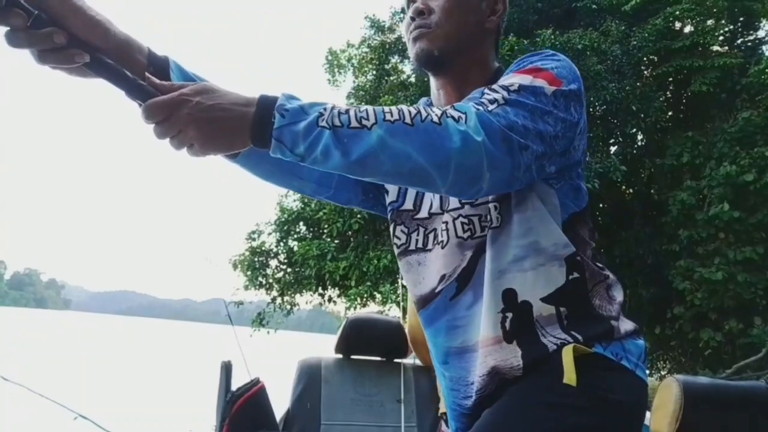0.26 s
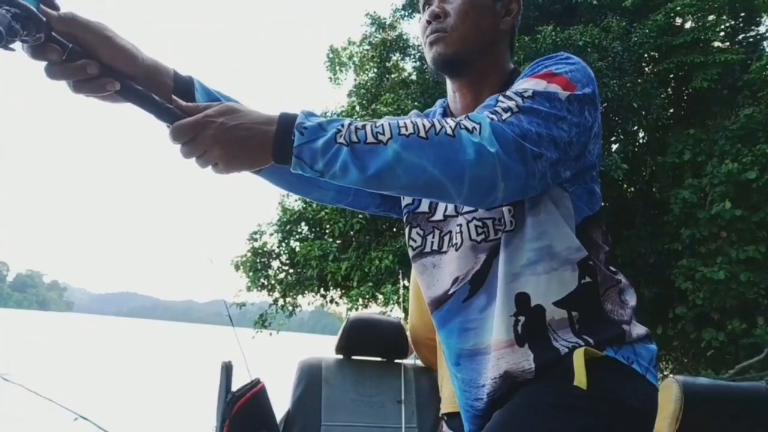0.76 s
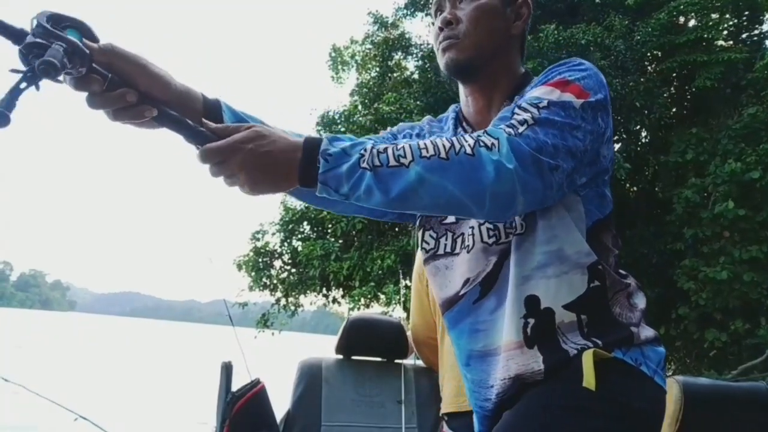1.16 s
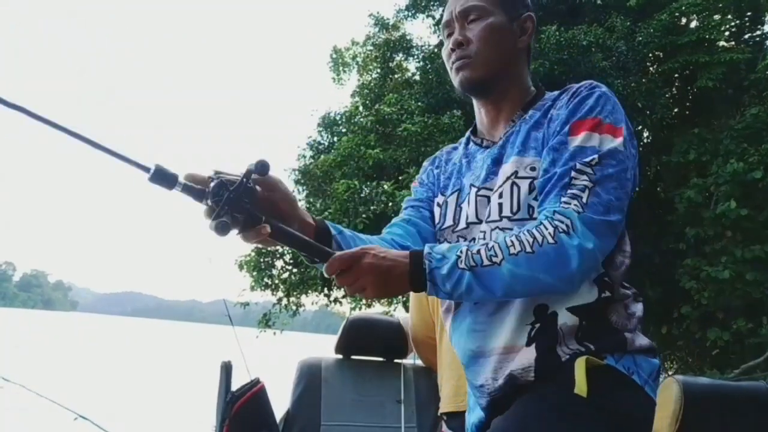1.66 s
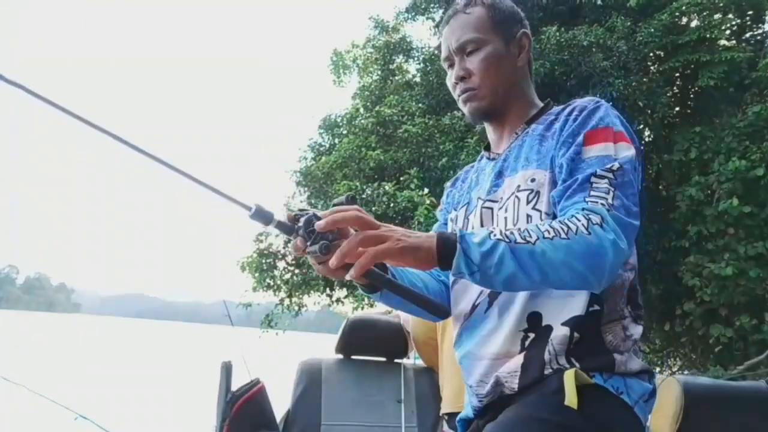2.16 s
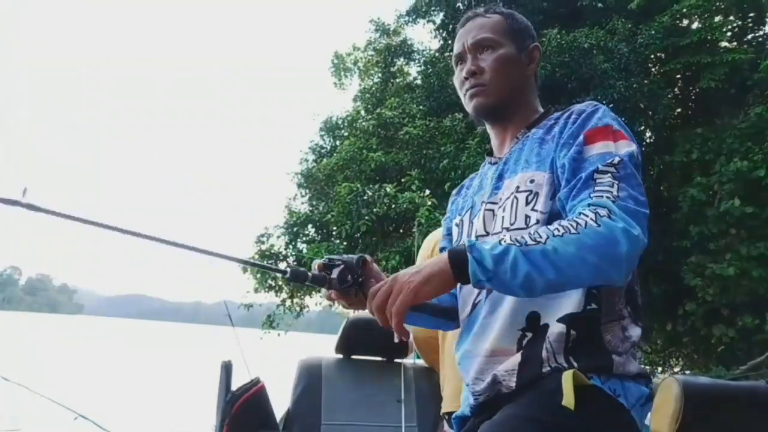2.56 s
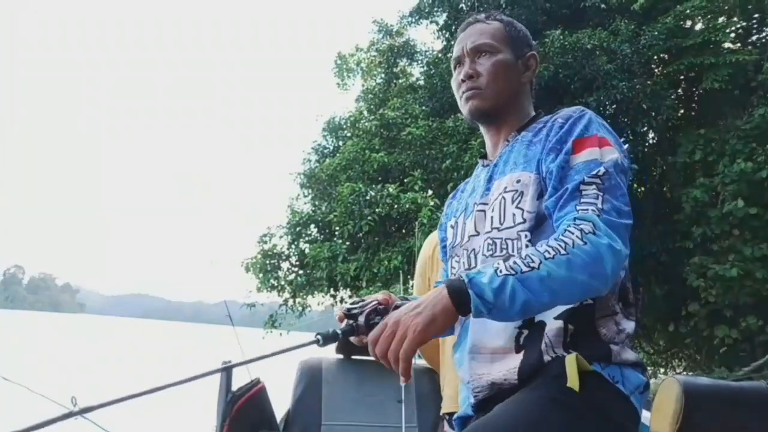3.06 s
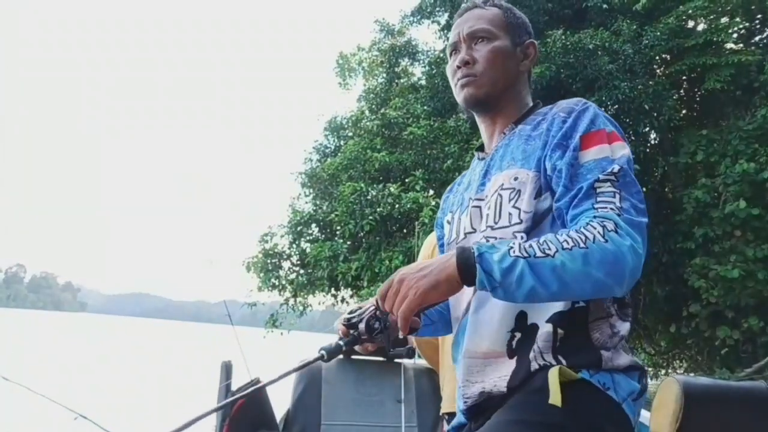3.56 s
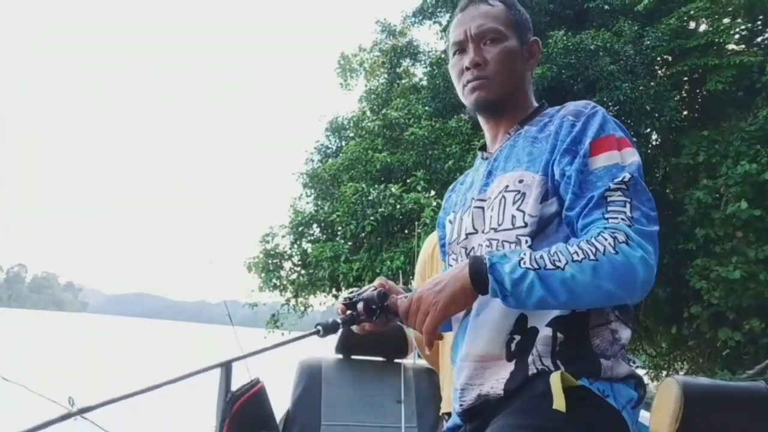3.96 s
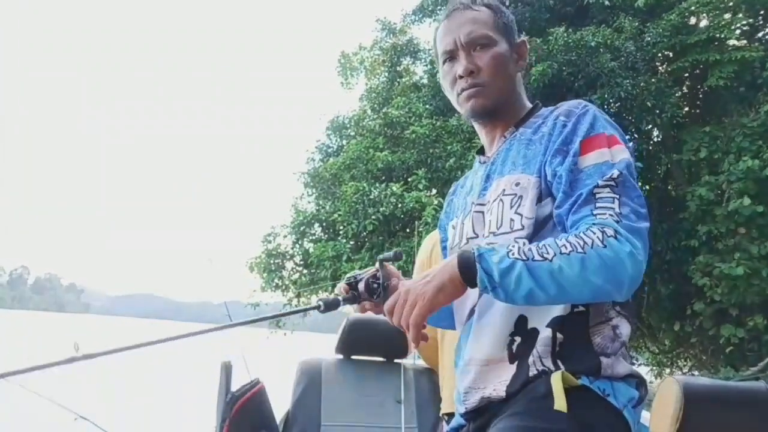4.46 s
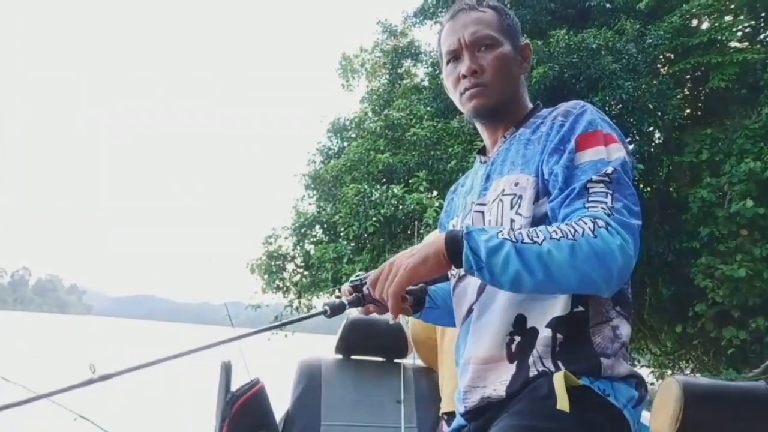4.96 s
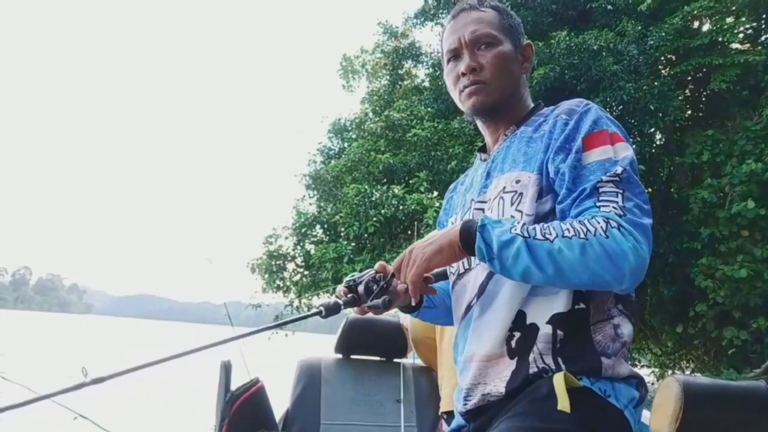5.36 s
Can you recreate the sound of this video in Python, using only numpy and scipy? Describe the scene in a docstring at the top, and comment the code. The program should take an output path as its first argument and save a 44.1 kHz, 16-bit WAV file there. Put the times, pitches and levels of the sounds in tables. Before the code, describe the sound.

A small boat on a quiet river beside forest, heard close in stereo with little deep bass and no extreme treble. From 0 s, fluttering, ticking line hiss runs off the spool, fading steadily and mostly gone by about 2 s. Under it are soft low hull booms, a knock with a bright rattle at 0.3 s, and a cluster of knocks and dry tackle clicks from 1.1 to 1.5 s, sharpest at 1.3 s. A light knock follows at 2 s. At 2.5 s the reel clutch snaps shut in a very quick volley of bright metallic cracks, the loudest event, with a short hissy tail. Gritty line swish swells from 3.05 to 3.3 s. Dull hull thumps land at 3.9, 4.75 and 5.05 s, the last more clattery. Faint rising drips occur between. Rapidly pulsed high cicada buzzing, nearest on the right, thin cricket chirps and low river murmur persist throughout.

```python
"""A small boat on a forest river just after a cast: the hiss of line off the spool dies away as noise with a
fading level, while water and feet knock the hull (swelling low notes, damped bursts) and reel and rod rattle.
At 2.5 s the reel's clutch snaps shut as a volley of metal rings; at 3 s the line swishes, gritty noise, as the
rod tip drops. Now and then a drop falls, a rising note. All the while cicadas buzz from the bank as pulsed
notes and noise, crickets chirp in narrow noise, and river and forest murmur in flickering bands."""
import sys
import numpy as np
from scipy import signal
from scipy.fft import rfft, irfft, next_fast_len
from scipy.io import wavfile
from scipy.ndimage import uniform_filter1d

SR = 44100
rng = np.random.default_rng(int(sys.argv[2]) if len(sys.argv) > 2 else 0)


def inscribe(sig):
    """Save sig as 16-bit PCM at rate SR to the path in sys.argv[1].

    A 1-D sig is mono; a 2-D sig holds one channel per row.
    Samples are clipped to [-1, 1] before scaling.
    """
    pcm = np.round(np.clip(np.atleast_2d(sig).T, -1, 1) * 32767)
    wavfile.write(sys.argv[1], SR, pcm.astype(np.int16))


N = 248264
T = np.arange(N) / SR

# Tone of river and forest. Each row: frequency in Hz, relative level in dB.
AIR_COLOUR = [(40, -12), (90, -4), (160, -1.5), (300, -11.5), (600, -20), (1200, -20), (2200, -15.5),
              (4500, -22.5), (5230, -36), (5310, -5.5), (5440, -15.5), (5510, -29), (5700, -12.5),
              (6100, -2), (6700, -19), (9500, -11.5), (10200, -12), (11500, -22.5), (12500, -5),
              (14500, -17.5), (15300, -11.5)]
# Far cicadas. Each row: pulses a second, level in dB before the chorus swell, pulse width in cycles,
# pitch in Hz, bandwidth in Hz, left minus right in dB.
FAR_CICADAS = [(121, -53.5, 1.05, 7630, 396, 0.5), (88.8, -57, 0.52, 8140, 525, -9)]
# Swell of all cicadas together. Each row: time in seconds, gain in dB.
CHORUS_SWELL = [(0, 8), (0.401, 4.5), (1.2, 5), (2.002, 3.5), (3.002, 4), (4, 3), (4.998, 2.5), (5.63, 2.5)]
# The near cicada's three buzzes in each cycle, a faint one and two louder, then a rest.
# Each row: place in the cycle from 0 to 1, relative level in dB, pitch in Hz, fall of pitch in Hz per cycle.
BUZZES = [(.27, -9, 7800, 2480), (.5, -3, 7890, 6070), (.73, -4, 7908, 6506)]
# Drift of the near cicada's rhythm. Each row: time in seconds, lead in cycles.
CYCLES_AHEAD = [(0, .52), (.6, .57), (1.8, .55), (2.4, .63), (3, .6), (4, .37), (4.9, .39), (5.63, .24)]
# Nearer cricket chirps. Each row: start in seconds, level in dB before the fade, pitch in Hz.
NEAR_CHIRPS = [(0.0494, -50.5, 9190), (0.5666, -53.5, 9240), (0.688, -52, 9200), (.975, -57, 9340),
               (1.4287, -56, 9050), (1.6806, -52, 9200), (1.9674, -57, 9050), (2.075, -57, 9400),
               (2.6339, -58, 9080), (2.6888, -53, 9190), (3.7853, -52, 9170), (4.39, -58, 9010),
               (4.4453, -56, 9390), (4.69, -58, 9210), (4.8304, -57, 9080), (4.9741, -52.5, 9190),
               (5.2106, -57, 9320), (5.36, -58, 9180), (5.57, -57, 9120)]
# Hull booms. Each row: time in seconds, level in dB, pitch in Hz, hold in seconds.
BOOMS = [(0.009, -52, 122, 0.045), (0.227, -41.5, 142, 0.011), (0.261, -49, 111.3, 0.035),
         (0.429, -51.5, 120, 0.029), (0.745, -64, 241, 0.017), (1.011, -45.5, 259, 0.013),
         (1.116, -52.5, 126, 0.013), (1.169, -49, 132.5, 0.036), (1.237, -59.5, 130, 0.019),
         (1.452, -43.5, 134.3, 0.029), (1.752, -50.5, 148, 0.03), (2.611, -55.5, 252.5, 0.03),
         (2.678, -58.5, 226.6, 0.028), (3.924, -31, 139.4, 0.0048), (3.944, -40.5, 143, 0.0093),
         (3.984, -40, 103, 0.011), (4.017, -41.5, 101, 0.0092), (4.747, -33, 142, 0.0041),
         (4.812, -46, 153, 0.012), (5.058, -32.5, 243, 0.0088), (5.138, -50, 210, 0.008),
         (5.157, -47, 178, 0.016), (5.314, -54.5, 90, 0.018), (5.341, -43, 115, 0.0086),
         (5.379, -48, 131, 0.014), (5.419, -48.5, 134, 0.008), (5.561, -62, 210, 0.012)]
# Drips from rod and line. Each row: start in seconds, level in dB, starting pitch in Hz, left minus right in dB.
DRIPS = [(1.7818, -61.5, 2180, 9), (1.81, -62, 1720, 8), (2.262, -59.5, 1830, -7), (2.369, -58.5, 1704, -7),
         (2.943, -58, 1770, 6), (3.502, -60.5, 1720, 8), (3.829, -59, 1276, 5), (4.057, -61.5, 1700, 13.5),
         (4.619, -60, 1674, 15)]
# Knocks and scuffs on the hull. Each row: start in seconds, level in dB, centre of the blow in Hz,
# spread in octaves, hold in seconds, left minus right in dB.
KNOCKS = [(.314, -29, 594, 0.33, 0.022, -1), (.325, -37.5, 950, 0.13, 0.0057, -1),
          (.357, -45, 1460, 0.53, 0.028, -6.5), (.552, -53, 720, 0.21, 0.018, 8),
          (.99, -49, 420, 0.46, 0.028, -3), (1.09, -51.5, 1400, 0.24, 0.032, -6),
          (1.15, -36.5, 533, 1.6, 0.0065, 0.5), (1.326, -39.5, 607, 0.083, 0.01, -3.5),
          (1.548, -38, 403, 0.36, 0.023, -0.5), (1.98, -44, 1090, 0.23, 0.034, -13),
          (2.0, -36.5, 846, 0.61, 0.016, 2.5), (2.608, -52.5, 485, 0.13, 0.065, 1.7),
          (3.917, -41.5, 1150, 0.3, 0.0041, -5), (3.926, -34.5, 205, 0.65, 0.024, 1),
          (3.94, -43, 414, 0.22, 0.014, -4), (4.033, -55.5, 1340, 0.73, 0.018, -1),
          (4.3, -54, 339, 0.74, 0.044, 1.5), (4.55, -64, 800, 1.5, 0.017, 8),
          (4.744, -25.5, 197, 0.9, 0.028, 1.5), (4.746, -43.5, 910, 0.36, 0.0035, 5),
          (4.753, -50, 990, 0.74, 0.018, 3), (4.785, -56, 890, 0.68, 0.0095, 0),
          (5.045, -44.5, 900, 0.53, .006, -6.5), (5.05, -32.5, 700, 0.68, 0.0044, 6),
          (5.0545, -28, 564, 1, 0.003, -1.5), (5.061, -30.5, 436, 1.1, 0.0089, 2),
          (5.072, -51, 1200, 0.88, 0.015, 0), (5.13, -43.5, 398, 0.18, 0.01, 1),
          (5.45, -60, 616, 0.7, 0.0089, -5.5), (5.555, -57, 394, 1.3, 0.019, -0.5)]
# Bands the struck hull planks radiate. Each row: frequency in Hz, width in octaves, level in dB,
# time in seconds for the noise to fall 60 dB.
HULL_MODES = [(201, 0.57, 4.5, 0.097), (273, 0.45, -14, 0.12), (435.4, 0.35, -3, 0.12),
              (515, 0.37, 0.5, 0.15), (606, 0.34, -4, 0.13), (709, 0.29, -5.5, 0.18), (958, 0.31, 1, 0.1),
              (1081, 0.27, -1, 0.1), (1394, 0.49, 1, 0.072), (1850, 0.76, 2.5, 0.24)]
# Small rattles of reel and rod. Each row: start in seconds, level in dB, centre of the blow in Hz,
# spread in octaves, hold in seconds, left minus right in dB.
RATTLES = [(.337, -33.5, 3950, 0.29, 0.0072, 0), (.745, -46.5, 4370, 0.19, 0.048, 0),
           (1.121, -41, 2000, .15, 0.0057, -11), (1.15, -43.5, 1840, 0.97, 0.004, 2),
           (1.161, -48, 1590, .7, .004, 2), (1.174, -47, 2020, .6, .006, 0),
           (1.235, -55.5, 1640, 0.77, 0.019, 1.5), (1.2473, -48, 3000, 0.6, 0.004, 4),
           (1.262, -49.5, 2800, 1.1, 0.02, 2), (1.26, -46, 10500, .3, 0.011, 1),
           (1.324, -29, 2620, 0.77, 0.00069, -0.5), (1.333, -42, 3300, 1.0, 0.003, 1),
           (1.343, -42, 3000, 1.2, .008, 2), (1.369, -44.5, 2400, 1.1, 0.003, -2),
           (1.378, -50, 2700, 1, .003, -2), (1.39, -52, 2700, 1, .004, -2),
           (1.421, -41.5, 2950, 1, 0.0066, -0.5), (1.45, -55, 2800, 1.2, .008, 2),
           (1.527, -55.5, 2880, 0.89, .015, 1), (2.002, -38.5, 2000, 0.18, 0.0015, -2),
           (2.155, -55.5, 3410, 0.14, 0.011, -1), (2.452, -49, 3360, 0.35, 0.004, -3),
           (4.42, -69, 1900, 1.1, 0.12, -4.5), (4.56, -59.5, 1970, 0.49, 0.041, -5),
           (4.752, -54, 1960, 0.59, 0.011, 2), (4.793, -62, 3500, .2, 0.0087, 1),
           (5.056, -48, 2060, 1, 0.0043, -4), (5.066, -55, 2390, .9, .03, -2),
           (5.127, -51, 2500, .2, .008, -3), (5.137, -48.5, 4130, 0.17, 0.012, -2),
           (5.182, -59, 1950, 0.44, 0.032, -6)]
# Bands that rattling reel and rod radiate. Each row: frequency in Hz, width in octaves, level in dB,
# time in seconds for the noise to fall 60 dB.
TACKLE_MODES = [(1368, 0.38, 6.5, 0.18), (2000, 0.22, -0.5, 0.11), (2610, 0.15, -9, 0.26),
                (3500, 0.31, 0, 0.21), (4050, 0.25, -1.5, 0.15), (4750, 0.23, -4, 0.095),
                (10460, 0.76, 2, .1)]
# Line swish. Each row: time in seconds, level in dB, scrape near 500 Hz in dB, scrape near 1200 Hz in dB.
SWISH_LEVELS = [(3.02, -80, -84, -80), (3.036, -66, -78, -64), (3.047, -60, -51, -52),
                (3.07, -50, -52, -52), (3.1, -43, -57, -51), (3.135, -41, -58, -57), (3.17, -40, -63, -63),
                (3.2, -38.5, -61, -57), (3.235, -37, -53, -52), (3.26, -39, -58, -49),
                (3.295, -47, -57, -57), (3.32, -58, -68, -68), (3.36, -80, -87, -87)]
# Tone of the swish. Each row: frequency in Hz, relative level in dB.
SWISH_COLOUR = [(600, -43), (1300, -8.5), (1690, -9.5), (2520, 0), (4070, -0.5), (5300, -8.5), (7000, -3.5),
                (9100, -19), (15400, -90.5)]
# Tone of the spool's lower hiss. Each row: frequency in Hz, relative level in dB.
SPOOL_COLOUR = [(880, -37), (1500, -21), (1800, -22), (2460, -3.5), (2800, -6), (3300, -11.5), (3700, -3.5),
                (3950, -0.5), (4250, -1), (4550, -6.5), (5180, -14), (6700, -6), (8840, -70), (15000, -120)]
# Clutch snapping shut and bouncing. Each row: start in seconds, level in dB, left minus right in dB.
CLUTCH_SNAPS = [(2.4797, -35, 7), (2.4802, -27, 0), (2.4828, -18, 0.5), (2.4833, -14.5, -1.5),
                (2.4865, -24, 6), (2.4888, -36, -3), (2.4947, -31, 1), (2.499, -35.5, -8),
                (2.512, -50.5, 0), (2.5225, -51, -2), (2.541, -57, 2), (2.561, -52, 0)]
# Ringing modes of the reel's frame. Each row: frequency in Hz, level in dB, seconds to fall 60 dB.
FRAME_MODES = [(890, -23, 0.027), (1460, -24, 0.037), (1920, -20.5, 0.059), (2710, -15, 0.03),
               (3240, -17.5, 0.04), (3530, -6, 0.013), (3840, -2, .012), (4075, 1.5, 0.011),
               (5000, -14.5, 0.017), (5662, -18, .012), (7230, -3.5, 0.029), (7560, 6, .007),
               (7980, 1, 0.0094), (8680, 1, 0.012), (9360, -7, 0.012), (9880, -0.5, .015),
               (10600, -4.5, 0.0099), (12120, -9, 0.014), (14400, -3, .011), (15180, -11, .01)]

# near cicada: rhythm, buzz width in cycles, waver of pitch, level before the swell, and place on the right
CYCLE_HZ, BUZZ_WIDTH, BUZZ_WAVER_HZ, OVERTONE_HZ = 21.15, 0.058, 90.12, 15200
NEAR_DB, BUZZ_RASP_DB, NEAR_PAN_DB = -57, -8, -10
# samples by which the left channel trails the right; below zero it leads
NEAR_LAG, SPOOL_LAG = 12, -10
# crickets: far ones are up to FAR_FAINTER_DB weaker, on notes across FAR_SPREAD_HZ
CHIRP_HZ, CHIRP_T60_S = 9190, 0.6
FAR_CHIRPS, FAR_CHIRP_DB, FAR_FAINTER_DB, FAR_SPREAD_HZ = 14, -62, 4, 420
BOOM_RISE_S, BOOM_T60_S, RUMBLE_DB = 0.0059, 0.12, -3
DRIP_T60_S = 0.091
# blows: bands narrower than about NOTE_OCTAVES ring a note; low bands take longer to speak
NOTE_OCTAVES, SWELL_CYCLES = 0.6, 0.37
SWISH_TOP_DB, SWISH_STUTTER_DB, SWISH_GRIT_DB, SWISH_RASP_DB = 3, 1.6, 2.2, 1.3
# spool: a quick drop after the whip of the cast, then a steady fade; the top octave fades more slowly
SPOOL_DB, SPOOL_FADE_DB_PER_S, WHIP_DB, WHIP_S = -48, 28, 2, 0.021
SPOOL_TOP_DB, SPOOL_TOP_FADE_DB_PER_S = -47.5, 15.5
SPOOL_TURNS_HZ, SPOOL_SLOWS_HZ_PER_S, SPOOL_WOBBLE_DB = 187, 70, -2
SPOOL_FLUTTER_DB, SPOOL_JITTER_DB, SPOOL_TICK_DB = 0.7, 1.2, 2.5
BOTTOM_HZ, TREBLE_HZ, TOP_HZ, HEADROOM = 55.3, 13500, 15650, 1.1


def undb(db):
    """Turn dB into an amplitude factor."""
    return 10 ** (np.asarray(db) / 20)


def level(x, db):
    """Bring a sound to an RMS level in dB."""
    return x * undb(db) / np.sqrt(np.mean(x ** 2))


def fade(t, t60):
    """Ring down by 60 dB in t60 seconds."""
    return undb(-60 * t / t60)


def pan(db):
    """Left and right gains that differ by db."""
    return undb([[db / 2], [-db / 2]])


def colour(x, points):
    """Shape a spectrum by (Hz, dB) points, joined along a log frequency axis."""
    hz, db = np.transpose(points)
    size = next_fast_len(N)
    f = np.fft.rfftfreq(size, 1 / SR) + 1
    gain = undb(np.interp(np.log(f), np.log(hz), db))
    return irfft(rfft(x, size) * gain, size)[:, :N]


def band(x, hz, width, order=1):
    """Band-pass around a centre, width in Hz."""
    edges = [max(hz - width / 2, hz / 4), min(hz + width / 2, SR / 2.1)]
    return signal.sosfilt(signal.butter(order, edges, "band", fs=SR, output="sos"), x)


def pair(n, alike):
    """Left and right noise with a given likeness, 0 unrelated to 1 identical."""
    mid, side = rng.standard_normal((2, n))
    alike = np.clip(alike, 0, 1)
    mid, side = np.sqrt(1 + alike) * mid, np.sqrt(1 - alike) * side
    return (mid + side * np.array([[1], [-1]])) / np.sqrt(2)


def walk(rate):
    """Random levels held 1 / rate s and slewed twice, worked out on a coarse grid; spread near 1."""
    step = 32
    k = max(int(SR / step / rate), 1)
    held = np.repeat(rng.standard_normal(N // (step * k) + 2), k)
    slewed = 1.3 * uniform_filter1d(uniform_filter1d(held, k), k)
    return np.interp(np.arange(N) / step, np.arange(len(held)), slewed)


def grains(n, hold):
    """Random levels that jump every hold samples; spread 1."""
    return rng.standard_normal(n // hold + 1).repeat(hold)[:n]


def lag(x, count):
    """Delay the left channel against the right."""
    return np.array([np.roll(x[0], count), x[1]])


def add(out, s, sound, pan_db=0):
    """Mix a sound in at a time and side."""
    i = int(s * SR)
    sound = np.atleast_2d(sound)[:, :N - i]
    out[:, i:i + sound.shape[1]] += sound * pan(pan_db)


def air():
    """River and forest far off: lapping bass alike in both ears, mids that flicker band by band, a steady top."""
    out, apart, together = 0, pair(N, 0), pair(N, 0.68)
    for hz in 45 * 2 ** np.arange(0, 8.5, 1 / 3):
        alike = np.clip(1.1 - hz / 500, 0, .95)
        mix = np.sqrt(alike) * together + np.sqrt(1 - alike) * apart
        noise = band(mix, hz, hz / 4.28, order=2)
        unrest = 1 / (1 + (hz / 5600) ** 8)
        out = out + noise * undb(unrest * (0.67 * walk(27.0) + 2.32 * walk(50)))
    return level(colour(out, AIR_COLOUR), -58.5) * pan(-0.6)


def cicadas():
    """Far insects, pulsed noise with an overtone each, blur behind the near one; all swell together."""
    out = near_cicada()
    for hz, db, duty, pitch_hz, width, pan_db in FAR_CICADAS:
        phase = np.cumsum(hz * (1 + 0.0029 * walk(2.1))) / SR % 1
        gate = np.exp(-((phase - .5) / duty) ** 2) * undb(0.57 * walk(3.34))
        drive = pair(N, 0.064) * gate
        song = level(band(drive, pitch_hz, width, order=2), db)
        overtone = level(band(drive, 1.95 * pitch_hz, 0.5 * width), db - 12.5)
        out = out + (song + overtone) * pan(pan_db)
    s, swell_db = np.transpose(CHORUS_SWELL)
    return out * undb(np.interp(T, s, swell_db))


def near_cicada():
    """An insect off to the right buzzes in a pattern: notes sliding down, rasp, an overtone about an octave up."""
    cycle = (CYCLE_HZ * T + np.interp(T, *np.transpose(CYCLES_AHEAD))) % 1
    unrest, waver_hz = undb(2.04 * walk(60)), BUZZ_WAVER_HZ * walk(150)
    notes, gate = 0, 0
    for place, db, hz, fall in BUZZES:
        buzz = undb(db) * np.exp(-((cycle - place) / BUZZ_WIDTH) ** 2 / 2) * unrest
        pitch_hz = hz - fall * (cycle - place) + waver_hz
        notes = notes + buzz * np.sin(2 * np.pi * np.cumsum(pitch_hz) / SR)
        gate = gate + buzz
    gated = pair(N, 0.39) * gate
    rasp = level(band(gated, 8040, 840, order=2), NEAR_DB + BUZZ_RASP_DB)
    overtone = level(band(gated, OVERTONE_HZ, 600), NEAR_DB - 31.5)
    return lag(level(notes, NEAR_DB) + rasp + overtone, count=NEAR_LAG) * pan(NEAR_PAN_DB)


def cricket():
    """Narrow, high chirps with a quick start and a ragged fade; farther ones fall at random on nearby notes."""
    out, t = np.zeros((2, N)), T[:SR // 3]
    env = (1 - np.exp(-t / 0.00078)) * fade(t, CHIRP_T60_S)
    far = []
    for k, (when, fainter, note) in enumerate(rng.random((FAR_CHIRPS, 3))):
        s = (k + when) / FAR_CHIRPS * T[-1]
        far.append((s, FAR_CHIRP_DB - FAR_FAINTER_DB * fainter, CHIRP_HZ + FAR_SPREAD_HZ * (note - .5)))
    for s, db, hz in [*NEAR_CHIRPS, *far]:
        chirp = level(band(pair(len(t), 0.52), hz, 95, order=2), db)
        add(out, s, env * chirp, 0.5)
    return out


def drips():
    """Each drop leaves a small bubble whose note rises a little as it fades."""
    out, t = np.zeros((2, N)), T[:SR // 3]
    env = (1 - np.exp(-t / 0.0015)) * fade(t, DRIP_T60_S)
    for s, db, hz, pan_db in DRIPS:
        add(out, s, undb(db) * env * np.sin(2 * np.pi * hz * t * (1 + 0.51 * t)), pan_db)
    return out


def booms():
    """Each push on the hull swells quickly, holds, then dies; a rough rumble rides on its note."""
    out, t = np.zeros((2, N)), T[:SR // 5]
    for s, db, hz, hold in BOOMS:
        rise = np.clip(t / BOOM_RISE_S, 0, 1)
        env = rise * fade(np.maximum(t - BOOM_RISE_S - hold, 0), BOOM_T60_S)
        rumble = level(band(pair(len(t), 0.63), 0.92 * hz, 0.39 * hz, order=2), RUMBLE_DB)
        # the swell begins 4 ms ahead of the listed time
        add(out, s - .004, undb(db) * env * (np.sin(2 * np.pi * hz * t) + rumble))
    return out


def taps(table, body, alike, rise, grain_db, note_db, crack_db):
    """A damped blow: gritty noise in the bands that the struck body radiates, most near the blow's centre."""
    out, t = np.zeros((2, N)), T[:SR // 5]
    for s, db, centre_hz, spread, hold, pan_db in table:
        # contact comes and goes every couple of milliseconds; a brief contact starts with a crack
        crack = 1 + undb(crack_db) * np.exp(-hold / 0.0032 - t / 0.002)
        contact = undb(grain_db * grains(len(t), 90)) * pair(len(t), alike)
        for hz, octaves, mode_db, t60 in body:
            share = undb(mode_db) / (1 + (np.log2(hz / centre_hz) / spread) ** 2) ** 2.3
            onset = crack * (1 - np.exp(-t / (rise + SWELL_CYCLES / hz)))
            width = hz * 2 * np.tanh(octaves * np.log(2) / 2)
            noise = level(band(contact, hz, width, order=2), -10.5)
            burst = noise * onset * fade(np.maximum(t - hold, 0), t60)
            # the first touch leaves a note ringing; the narrower the band, the more it stands out
            purity = np.exp(-(octaves / NOTE_OCTAVES) ** 2)
            note_env = purity * onset * undb(note_db) * fade(t, 0.54 * t60 + 3 * hold)
            add(out, s, undb(db) * share * (burst + note_env * np.sin(2 * np.pi * hz * t)), pan_db)
    return out


def knocks():
    """Knocks and scuffs drive the broad, damped bands of the hull planks."""
    return taps(KNOCKS, HULL_MODES, alike=0.37, rise=0.00029, grain_db=1.0, note_db=-6.5, crack_db=0)


def rattles():
    """Reel and rod rattle: rougher contact and a sharper crack in the brighter bands of the tackle."""
    return taps(RATTLES, TACKLE_MODES, alike=0.073, rise=0.0006, grain_db=2.0, note_db=-12.5, crack_db=8.5)


def swish():
    """Wet line drags through the guides: dense, rough, wide grit over two low scrapes nearly alike in both ears."""
    s, *curves = np.transpose(SWISH_LEVELS)
    gain, low_gain, upper_gain = (undb(np.interp(T, s, c, -120, -120)) for c in curves)
    grit = undb(SWISH_GRIT_DB * grains(N, 20) + SWISH_RASP_DB * walk(400))
    stutter = undb(SWISH_STUTTER_DB * walk(110))
    mid = level(colour(stutter * grit * pair(N, 0.12), SWISH_COLOUR), 0)
    top = level(band(grit * pair(N, 0), 11000, 9700, order=2), SWISH_TOP_DB) * pan(1.6)
    scrape = stutter * grit * pair(N, 0.87)
    low = level(band(scrape, 515, 183, order=2), 0)
    upper = level(band(scrape, 1190, 630, order=2), 0)
    return gain * (mid + top) + low_gain * low + upper_gain * upper


def spool():
    """Line whips off the spinning spool and through the guides: fluttering, ticking hiss around a few resonances."""
    whip_db = WHIP_DB * np.exp(-T / WHIP_S)
    # the wobble slows to a stop near 2.7 s; past that it quickens again, under a hiss long faded
    turns = SPOOL_TURNS_HZ * T - SPOOL_SLOWS_HZ_PER_S * T ** 2 / 2
    wobble_db = SPOOL_WOBBLE_DB * np.sin(2 * np.pi * turns)
    flutter_db = SPOOL_FLUTTER_DB * walk(66) + SPOOL_JITTER_DB * walk(400)
    flutter = level(undb(flutter_db + SPOOL_TICK_DB * grains(N, 40) + wobble_db), 0)
    low = level(colour(flutter * lag(pair(N, 0.34), count=SPOOL_LAG), SPOOL_COLOUR), SPOOL_DB)
    top = level(band(flutter * pair(N, 0.11), 12000, 8430, order=2), SPOOL_TOP_DB)
    low = low * undb(-SPOOL_FADE_DB_PER_S * T)
    top = top * undb(-SPOOL_TOP_FADE_DB_PER_S * T)
    return undb(whip_db) * (low + top)


def clutch():
    """Metal snaps ring the frame; the boat and water scatter a short hissy tail."""
    out, t = np.zeros((2, N)), T[:SR // 5]
    n = len(t)
    for s, db, pan_db in CLUTCH_SNAPS:
        # each mode starts at a random phase, a little apart in the two ears
        phase = rng.uniform(0, 2 * np.pi, (len(FRAME_MODES), 1))
        phase = phase + 0.56 * rng.standard_normal((len(FRAME_MODES), 2))
        ring = 0
        for (hz, mode_db, t60), p in zip(FRAME_MODES, phase):
            ring = ring + undb(mode_db) * fade(t, t60) * np.sin(2 * np.pi * hz * t + p[:, None])
        crack = band(pair(n, 0.24), 7400, 13070, order=2) * undb(2.0) * fade(t, 0.014)
        thud = band(pair(n, 0.77), 560, 550) * undb(-16.5) * fade(t, 0.023)
        rattle_env = undb(-16.5 + 1.9 * grains(n, 150)) * fade(t, 0.16)
        rattle = band(pair(n, 0.22), 3140, 2900, order=3) * rattle_env
        tail_env = undb(-19.5 + 1.3 * grains(n, 120)) * fade(t, 0.27)
        tail = band(pair(n, 0.11), 7500, 14600, order=2) * tail_env
        attack = 1 - np.exp(-t / 0.00019)
        add(out, s, undb(db) * attack * (ring + thud + crack + rattle + tail), pan_db)
    return out


def scene():
    """Layer the bank, the boat and the tackle."""
    bank = air() + cicadas() + cricket()
    boat = drips() + booms() + knocks()
    tackle = rattles() + swish() + spool() + clutch()
    return bank + boat + tackle


def record(dry):
    """Two close ports share most bass, the left a little brighter; the phone cuts deep bass and rounds peaks."""
    side = (dry[0] - dry[1]) / 2
    low_side = signal.sosfilt(signal.butter(1, 300, fs=SR, output="sos"), side)
    treble = band(dry, TREBLE_HZ, 5100)
    wet = dry + (0.074 * treble - 0.62 * low_side) * np.array([[1], [-1]])
    wet = signal.sosfilt(signal.butter(2, BOTTOM_HZ, "high", fs=SR, output="sos"), wet)
    rounded = HEADROOM * np.tanh(wet / HEADROOM)
    # almost nothing is heard above TOP_HZ
    return signal.sosfilt(signal.ellip(10, .2, 80, TOP_HZ, fs=SR, output="sos"), rounded)


dry = scene()
out = record(dry)
inscribe(out)
```